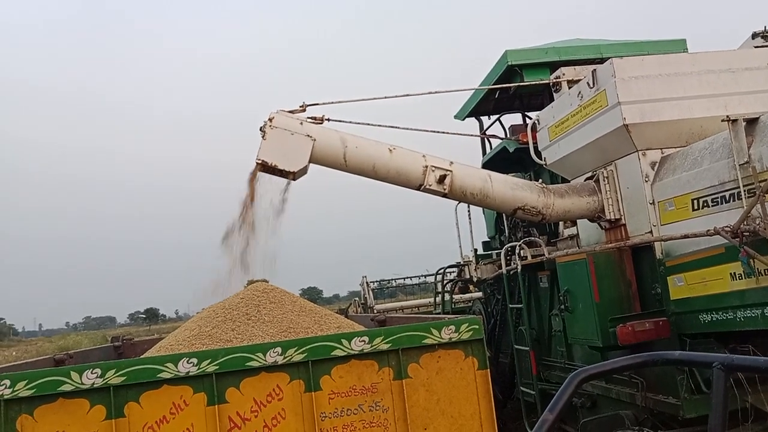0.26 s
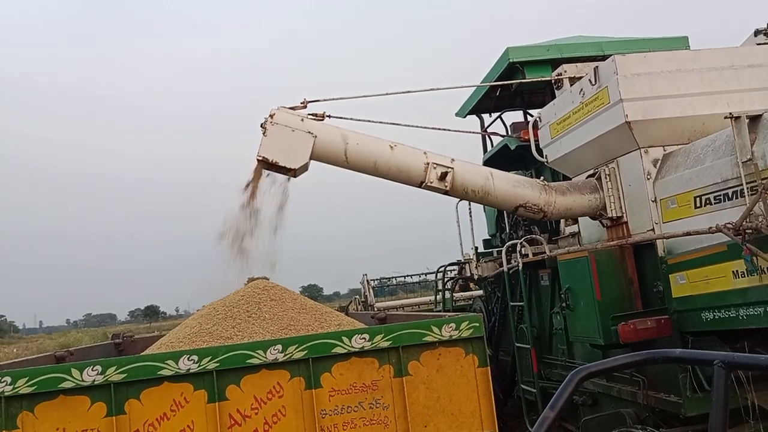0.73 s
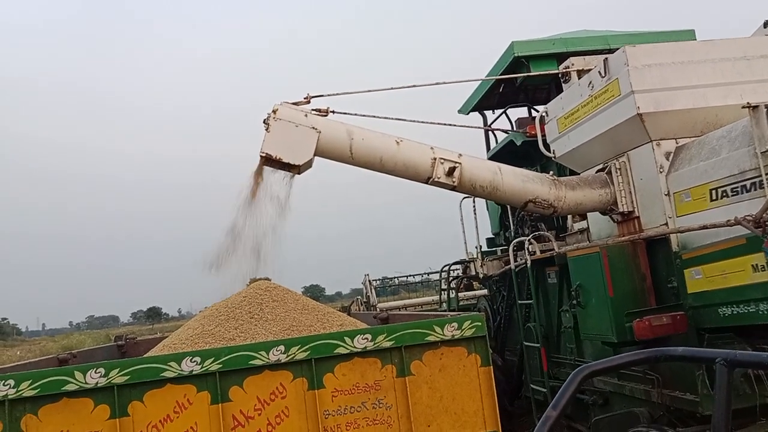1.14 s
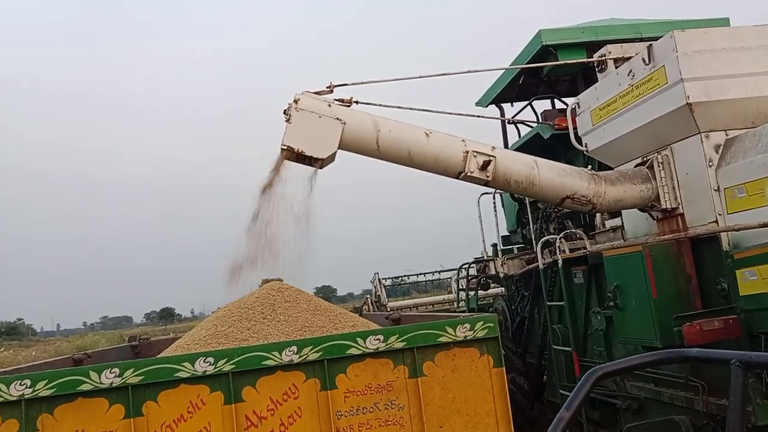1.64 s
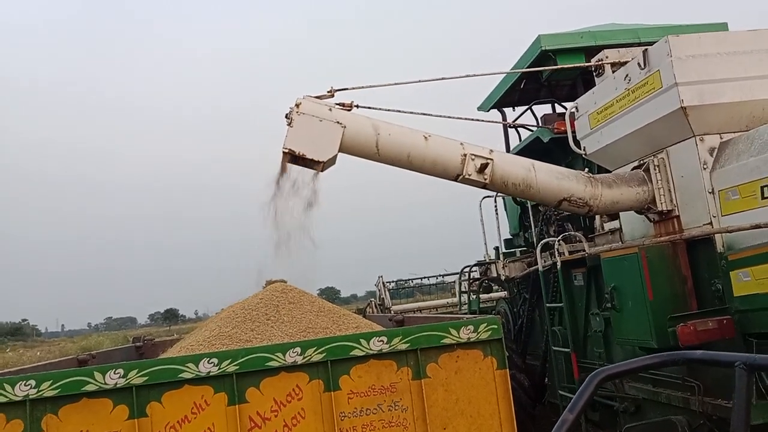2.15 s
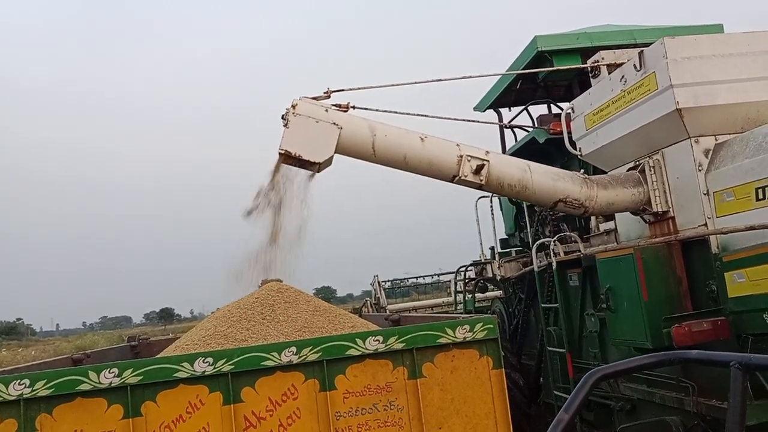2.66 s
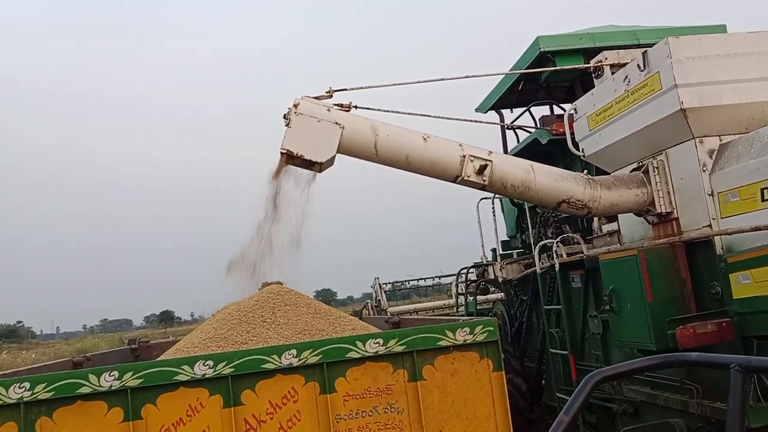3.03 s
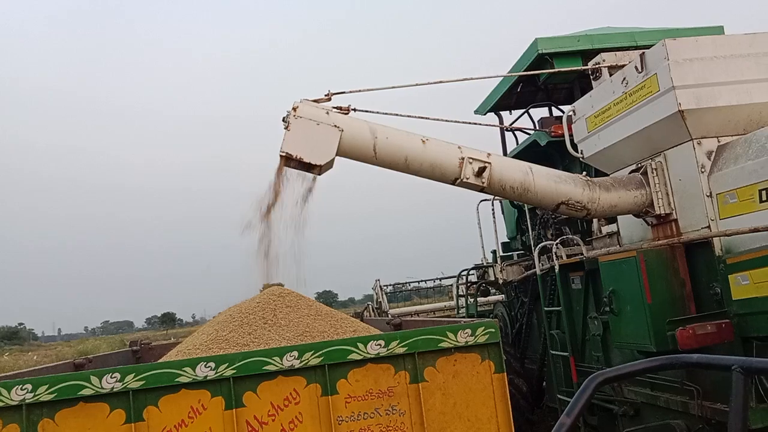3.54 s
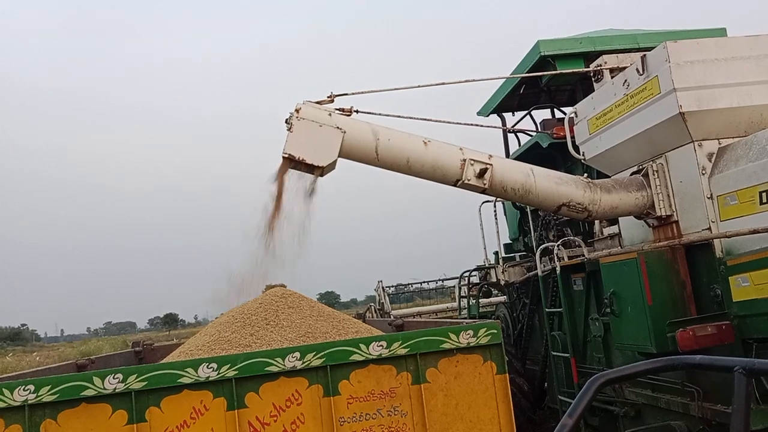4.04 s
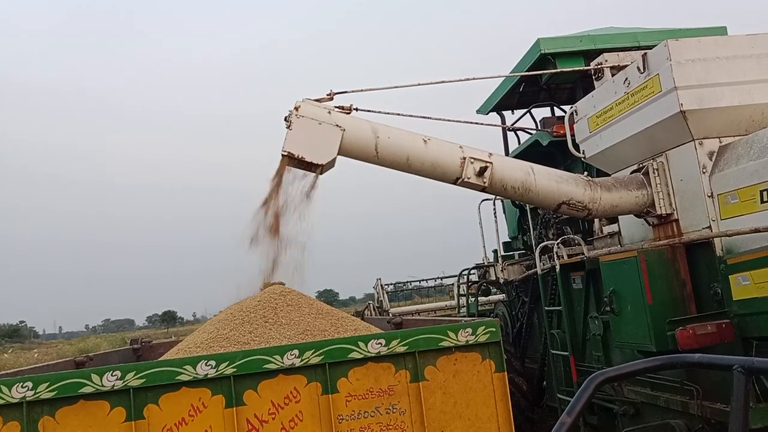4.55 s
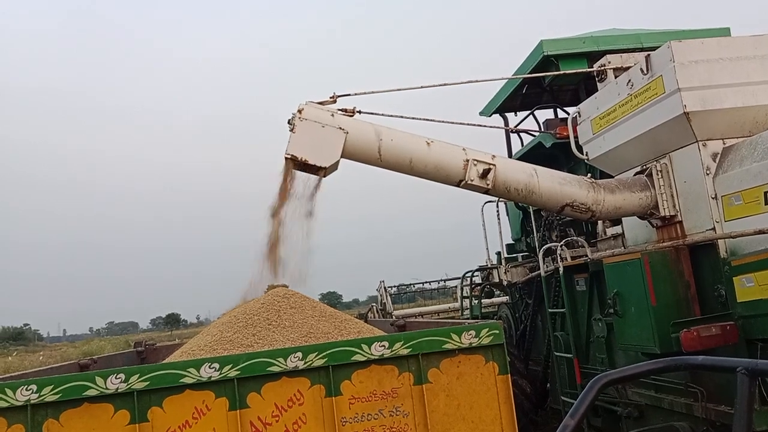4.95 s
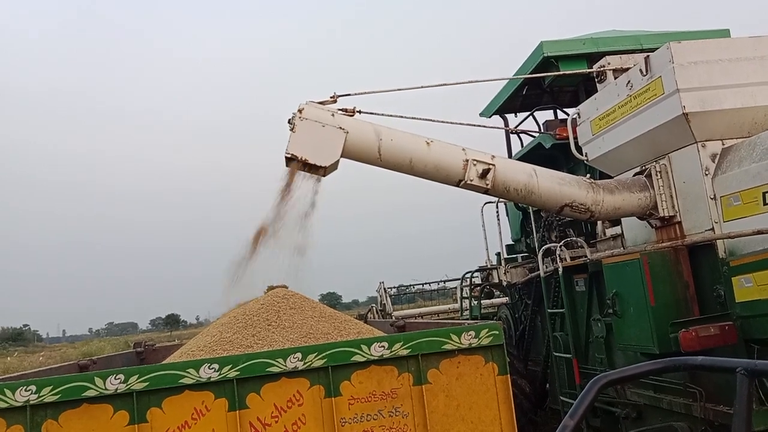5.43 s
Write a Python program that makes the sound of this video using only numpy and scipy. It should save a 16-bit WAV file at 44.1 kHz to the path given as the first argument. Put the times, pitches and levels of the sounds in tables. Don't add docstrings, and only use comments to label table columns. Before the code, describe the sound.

For about 5.7 seconds a combine harvester unloads grain in an open field, already running at the start and still going at the end. A rough, low diesel rumble with quick uneven firing fills the bottom, wavering slightly as hull panels shake. Over it, the sheet-metal auger tube rattles with kernels and chain, and its turning flight knocks irregularly, up to about eight times a second. Early knocks are modest; stronger ones come around 1.3 to 1.4 seconds, and the loudest pair near 2.4 and 2.5. A calmer stretch follows, then short taps cluster from 3.5 to 3.9, with another firm clank near 5.0. Grain hisses steadily onto the heap, with bright chaff on top and small kernel spits, notably near 0.8, 3.0 and 3.9. The sound is dry, close to mid-distance, mono, with a phone's coloured treble and no echo.

```python
import sys
import numpy as np
from scipy import signal
from scipy.fft import rfft, irfft, next_fast_len
from scipy.io import wavfile
from scipy.ndimage import uniform_filter1d

SR = 44100
rng = np.random.default_rng(int(sys.argv[2]) if len(sys.argv) > 2 else 0)


def convert_level_to_amplitude(level_db):
    exponent = np.asarray(level_db, float) / 20
    return 10 ** exponent


def output_pcm(signal):
    pcm = np.clip(np.atleast_2d(signal).T, -1, 1) * 32767
    wavfile.write(sys.argv[1], SR, np.round(pcm).astype(np.int16))


N = 250929


def set_rms(x, rms_db):
    return x * convert_level_to_amplitude(rms_db) / np.sqrt(np.mean(x ** 2))


def colour(x, points):
    size = next_fast_len(len(x))
    hz = np.arange(size // 2 + 1) * SR / size + 1
    point_hz, point_db = np.transpose(points)
    gain_db = np.interp(np.log(hz), np.log(point_hz), point_db)
    return irfft(rfft(x, size) * convert_level_to_amplitude(gain_db), size)[:len(x)]


def ring(x, hz, width_hz):
    b, a = signal.iirpeak(hz, hz / width_hz, SR)
    return signal.lfilter(b, a, x)


def walk(rate_hz):
    hold = int(SR / rate_hz)
    steps = np.repeat(rng.standard_normal(N // hold + 1), hold)
    return 1.3 * uniform_filter1d(uniform_filter1d(steps, hold), hold)[:N]


def impacts(per_s, scatter_db):
    chance = rng.random((3, N))
    sign = np.sign(chance[2] - 0.5)
    size = convert_level_to_amplitude(-scatter_db * np.log(1 - chance[1])) * sign
    return set_rms((chance[0] < per_s / SR) * size, 0)


def bursts(starts_s, peaks_db, lengths_s, rises_s):
    t = np.arange(SR // 3) / SR
    out = np.zeros(N + len(t))
    for start_s, peak_db, length_s, rise_s in np.broadcast(starts_s, peaks_db, lengths_s, rises_s):
        first = int(start_s * SR)
        swell = (1 - np.exp(-t / rise_s)) * np.exp(-(t / length_s) ** 1.5)
        out[first:first + len(t)] += convert_level_to_amplitude(peak_db) * swell
    return out[:N]


def engine(phase):
    # hz, width_hz, level_db
    hull_modes = [(65, 29, -15.5), (87.8, 18.4, -3.5), (104, 8, -4), (142.4, 22, 0.5), (165.2, 18.8, 2),
                  (200.9, 20.3, 0), (238.5, 43, -3), (285.4, 35.4, -2), (335, 28.7, -7), (394.3, 82, -11),
                  (477, 40.6, -12)]
    # start_s, rumble_db
    effort = [(0.0, -14.5), (0.42, -17), (0.62, -14.5), (0.9, -14), (1.15, -17.5), (1.3, -14.5),
              (1.57, -16.5), (2.03, -14), (2.3, -15), (2.6, -15.5), (3.02, -18.5), (3.1, -15),
              (3.28, -18.5), (3.42, -15), (4.12, -16), (4.8, -15), (5.3, -15), (5.69, -16)]
    boom_db = -10 + 1.5 * walk(10)
    strength_db = 7.0 * np.clip(rng.standard_normal(N), -2, 1.4)
    fired = np.diff(np.floor(phase), prepend=0) * convert_level_to_amplitude(strength_db)
    hull = 0
    for k, (hz, width_hz, mode_db) in enumerate(hull_modes):
        shake = set_rms(fired, -6) + rng.standard_normal(N) * convert_level_to_amplitude(1.9 * walk(4.5))
        if hz < 120:
            shake = shake * convert_level_to_amplitude(boom_db + 8.5)
        mode = ring(ring(shake, hz, width_hz), hz, 2.77 * width_hz)
        hull = hull + (-1) ** k * convert_level_to_amplitude(mode_db) * mode
    air = colour(rng.standard_normal(N), [(30, -42), (80, 4.5), (300, -11), (700, -11), (3000, -32)])
    rumble = set_rms(hull, 0) + set_rms(air, -9)
    power = uniform_filter1d(uniform_filter1d(rumble ** 2, SR // 25), SR // 25) + 1e-6
    even = set_rms(rumble / power ** 0.12, 0)
    effort_db = np.interp(np.arange(N) / SR, *np.transpose(effort))
    return even * convert_level_to_amplitude(effort_db)


def auger():
    # start_s, peak_db, brightness_db, rattle_length_s
    knocks = [(0.1, -18.5, 2, 0.074), (0.27, -21.5, 9, 0.093), (0.565, -10, 7.5, 0.035),
              (0.674, -10, 6.5, 0.027), (0.803, -17, 7, 0.025), (0.886, -13, 7, 0.03),
              (1.043, -11.5, -15, 0.037), (1.165, -15.5, -8, 0.053), (1.304, -4.5, 3, 0.029),
              (1.436, -5.5, -5.5, 0.053), (1.783, -12, -15, 0.024), (1.917, -7.5, -9, 0.035),
              (2.05, -7, 5, 0.015), (2.286, -7, -1, 0.043), (2.423, 1.5, 2, 0.027),
              (2.541, -0.5, -3, 0.034), (3.034, -19, 7, 0.075), (3.514, -9, -1, 0.029),
              (3.575, -20, 12, 0.02), (3.641, -9, 0, 0.021), (3.762, -4, -3, 0.0083),
              (3.871, -9.5, -3, 0.01), (4.144, -10.5, 3, 0.015), (4.494, -14.5, 7.5, 0.035),
              (4.623, -13.5, 8.5, 0.015), (4.747, -9.5, 5, 0.042), (4.888, -9.5, -2, 0.026),
              (5.014, -4, 6, 0.023), (5.346, -10, -12, 0.035), (5.509, -6.5, 5, 0.062)]
    # hz, width_hz, level_db
    tube_modes = [(702, 73, 1.5), (867, 175, -1), (958.4, 77, 2), (1089, 62, 0), (1263, 75, 0),
                  (1369, 38, -3.5), (1720, 230, -23.5), (1960, 220, -9), (2250, 50, -8.5), (2490, 154, -10),
                  (3210, 186, -8.5), (3680, 570, -13), (4160, 500, -23)]
    # start_s, level_db
    clatter = [(0.0, -17.5), (0.13, -22.5), (0.63, -21.5), (1.19, -22.5), (1.9, -18), (2.25, -21),
               (2.47, -20), (2.76, -22), (3.33, -18.5), (3.64, -19.5), (4.17, -19.5), (4.94, -20),
               (5.31, -21), (5.69, -22)]
    start_s, peak_db, bright_db, length_s = np.transpose(knocks)
    rise_s, blow_db = 0.0042, -9.0
    blows = np.zeros(N)
    blows[((start_s + rise_s) * SR).astype(int)] = convert_level_to_amplitude(peak_db + blow_db + 21.5)
    clatter_db = np.interp(np.arange(N) / SR, *np.transpose(clatter))
    rattle = convert_level_to_amplitude(clatter_db + 1.0 * walk(12))
    dull = bursts(start_s, peak_db - 8.5, length_s, rise_s)
    bright = bursts(start_s, peak_db - 11 + bright_db, 0.8 * length_s, 0.91 * rise_s)
    shared = impacts(1000, 2.45)
    tube = 0
    for k, (hz, width_hz, mode_db) in enumerate(tube_modes):
        kernels = 0.7 * rng.standard_normal(N) * convert_level_to_amplitude(2.08 * walk(30)) + 0.5 * shared
        knock = dull * (hz / 1000) ** 0.6 if hz < 1500 else bright
        drive = kernels * (rattle + knock) + blows
        mode = ring(ring(drive, hz, 1.154 * width_hz), hz, 7.7 * width_hz)
        tube = tube + (-1) ** k * convert_level_to_amplitude(mode_db + 9.5) * mode
    return tube


def grain(phase):
    # start_s, hiss_db
    flow = [(0.0, -32.5), (0.44, -34.5), (0.68, -31), (0.86, -34.5), (1.12, -34.5), (1.66, -32),
            (2.01, -33.5), (2.26, -33), (3.04, -34.5), (3.8, -33), (4.58, -32.5), (5.69, -35.5)]
    # start_s, peak_db, length_s, chaff_db
    spits = [(0.307, -17, 0.01, -13), (0.465, -16, 0.016, -2), (0.58, -25, 0.018, 5),
             (0.722, -19, 0.013, 0), (0.801, -10, 0.025, -7), (1.194, -17, 0.02, -1),
             (1.627, -19, 0.012, 8), (1.712, -27, 0.014, 5), (1.816, -19, 0.013, 0.0),
             (2.46, -18, 0.013, 6), (2.967, -5.5, 0.019, -3.5), (3.072, -17.5, 0.011, -9),
             (3.306, -22, 0.013, 4), (3.539, -30, 0.0093, 2), (3.688, -15, 0.0063, -4),
             (3.864, -7, 0.0067, 2.5), (3.936, -21, 0.016, -2), (4.0248, -22, 0.015, -3),
             (4.417, -18, 0.014, -2), (4.788, -14, 0.029, -5), (5.26, -14, 0.016, -12),
             (5.434, -16, 0.018, 0)]
    # hz, density_db (per Hz)
    heap_colour = [(600, -36), (1500, -4.5), (3000, -6.5), (6000, 1), (9100, -0.5)]
    hiss_db = np.interp(np.arange(N) / SR, *np.transpose(flow)) + 1.0
    fine_db = hiss_db - 7.5
    throb = 1 + 0.09 * np.cos(2 * np.pi * phase)
    start_s, peak_db, length_s, chaff_db = np.transpose(spits)
    kernels = impacts(6000, 2.45) + 1.18 * rng.standard_normal(N)

    low = throb * convert_level_to_amplitude(hiss_db + 0.25 * walk(6.0) + 0.64 * walk(40))
    low = low + bursts(start_s, peak_db - 18.0, length_s, 0.0036)
    high = convert_level_to_amplitude(fine_db + 9.5 + 0.65 * walk(25) + 0.7 * walk(5))
    high = high + bursts(start_s, peak_db - 13 + chaff_db, length_s, 0.0037)

    body = colour(kernels * low, [*heap_colour, (9500, -2), (10500, -41), (22000, -40)])
    chaff = colour(kernels * high, [(8500, -44.5), (9300, -9.5), (9800, 0), (22000, -4.5)])
    return convert_level_to_amplitude(5.5) * (body + chaff)


def scene():
    firing_hz = 43.38
    phase = np.cumsum(firing_hz * (1 + 0.02 * walk(3) + 0.03 * walk(40))) / SR
    return (engine(phase) + auger() + grain(phase))[None]


def microphone(x):
    # hz, gain_db
    mic_colour = [(2800, 0), (3600, -14), (4200, -22.5), (4520, -30), (4800, -54), (5090, -28),
                  (5550, -22.5), (5800, -15),
                  (6700, -4.5), (7800, 1), (8700, -1.5), (9350, -17.5), (10300, -12.5), (11500, -15),
                  (13000, -9), (13800, -19.5), (15300, -13)]
    rounded = np.tanh(1.117 * x) / 1.086
    return colour(rounded, mic_colour)


def thin_out(x, floor_db, patchy_db):
    hz, _, lines = signal.stft(x, SR, nperseg=2048)
    bands = rng.standard_normal((2, len(lines) // 16 + 1, lines.shape[1]))
    step, patch = np.repeat(bands, 16, axis=1)[:, :len(lines)]
    near_notch = ((hz > 3450) & (hz < 5750))[:, None]
    kept = np.abs(lines) > convert_level_to_amplitude(floor_db + 1.5 * step) * near_notch
    patched = lines * kept * convert_level_to_amplitude(patchy_db * patch * near_notch)
    return signal.istft(patched, nperseg=2048)[1][:N]


def top_cut(x):
    return signal.sosfilt(signal.butter(12, 15490, fs=SR, output="sos"), x)


def record(dry):
    thinned = thin_out(microphone(dry[0]), floor_db=-77, patchy_db=4.5)
    return top_cut(thinned[None])


dry = scene()
out = record(dry)
output_pcm(out)
```